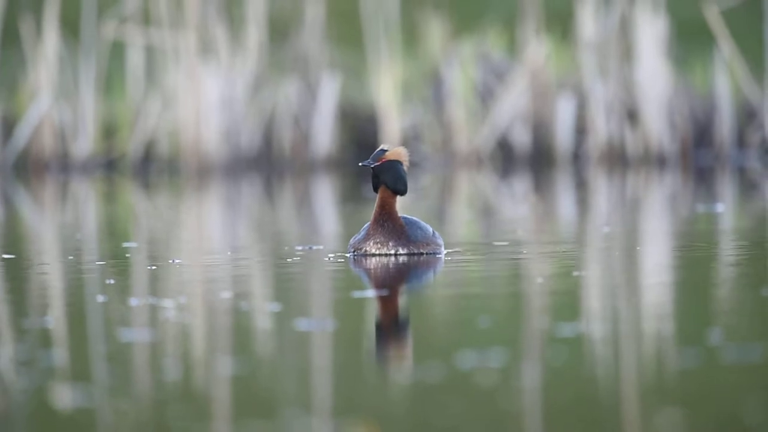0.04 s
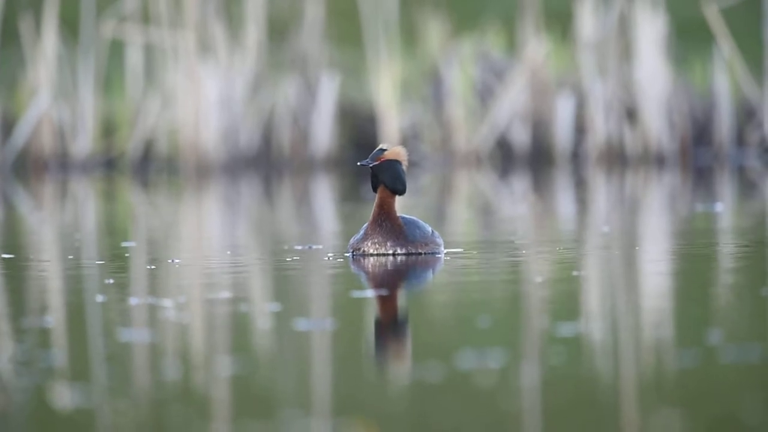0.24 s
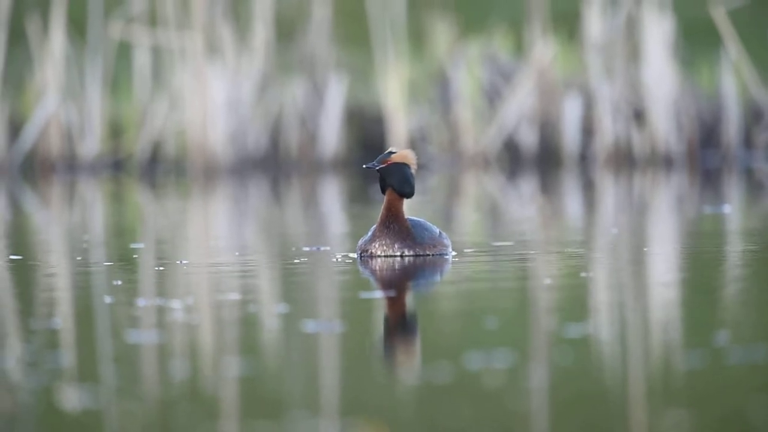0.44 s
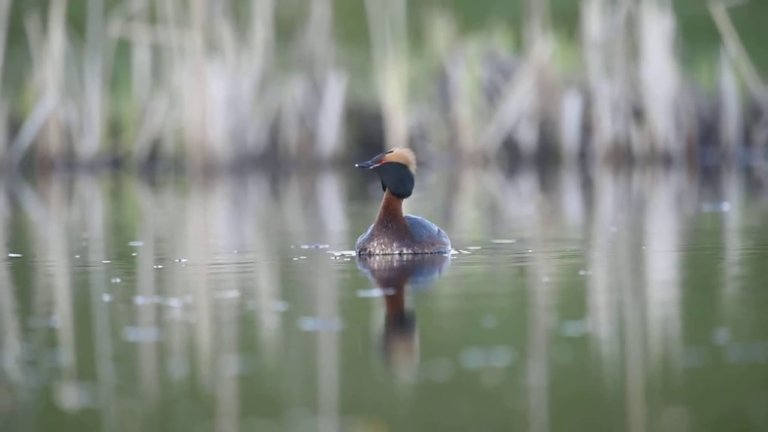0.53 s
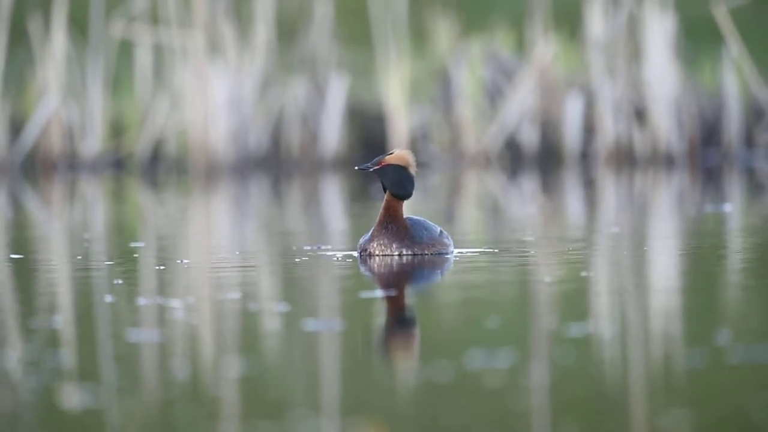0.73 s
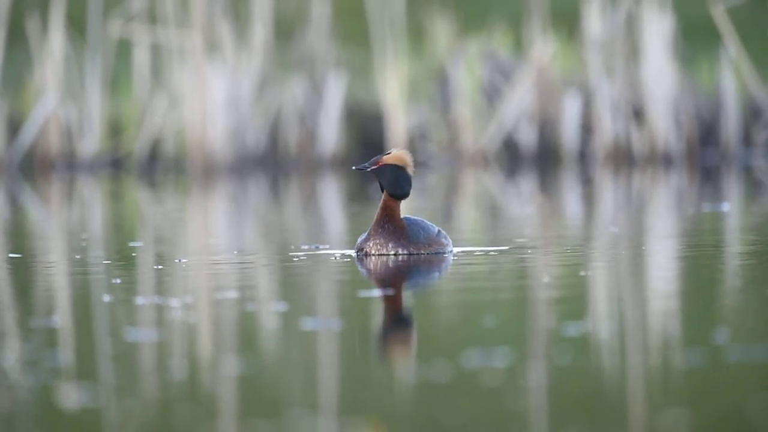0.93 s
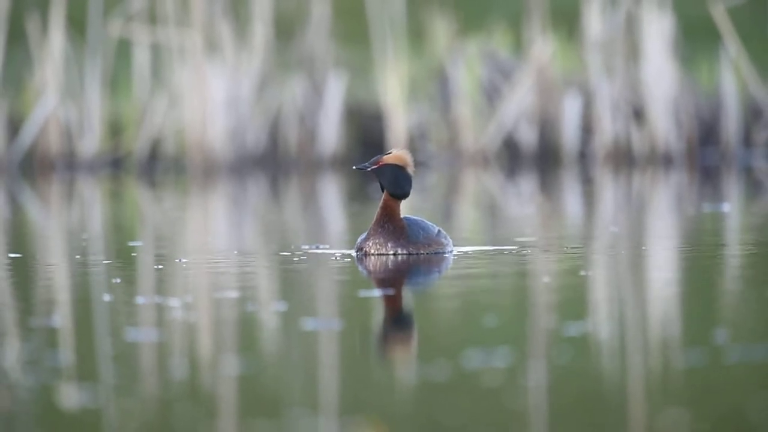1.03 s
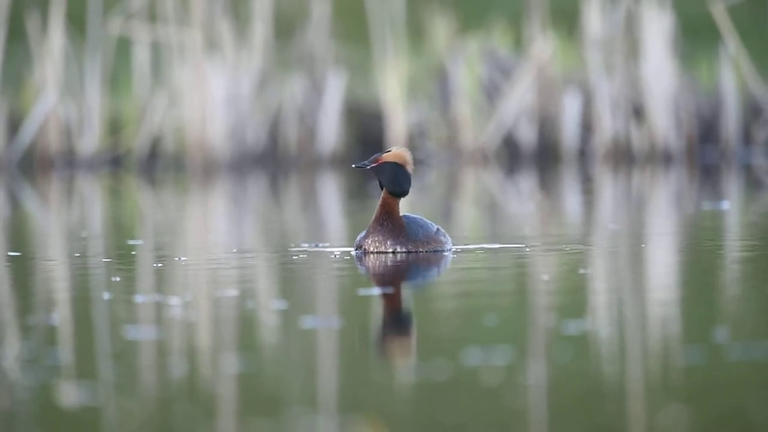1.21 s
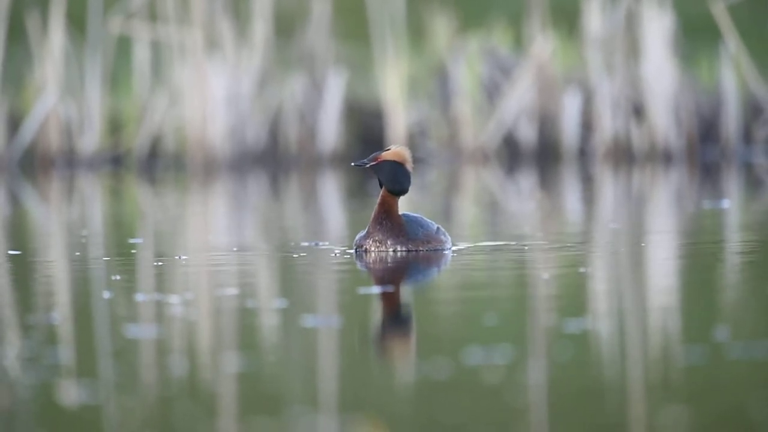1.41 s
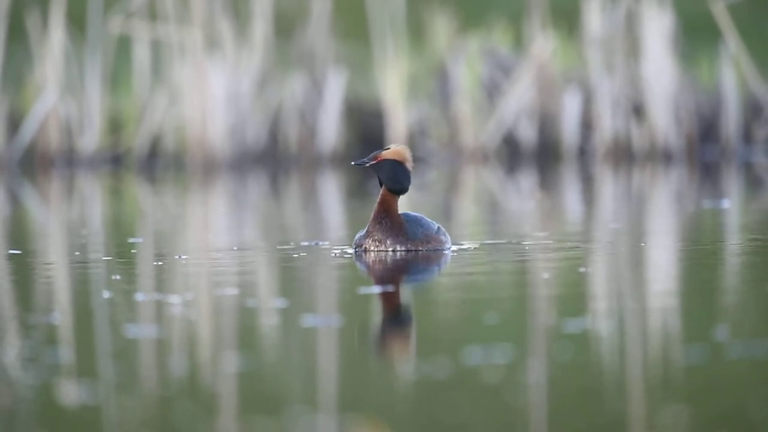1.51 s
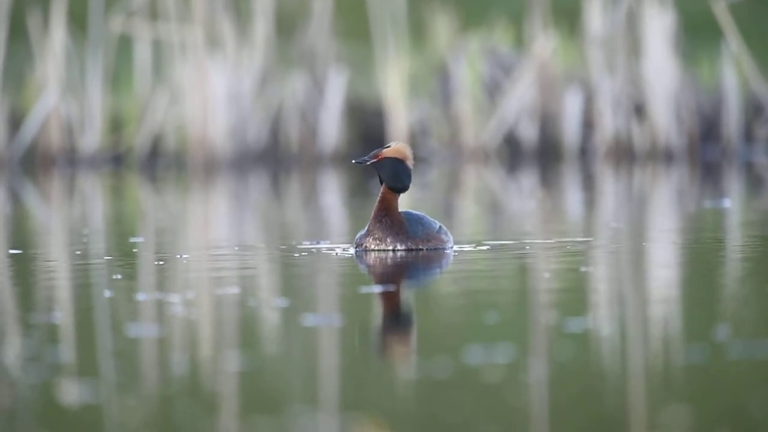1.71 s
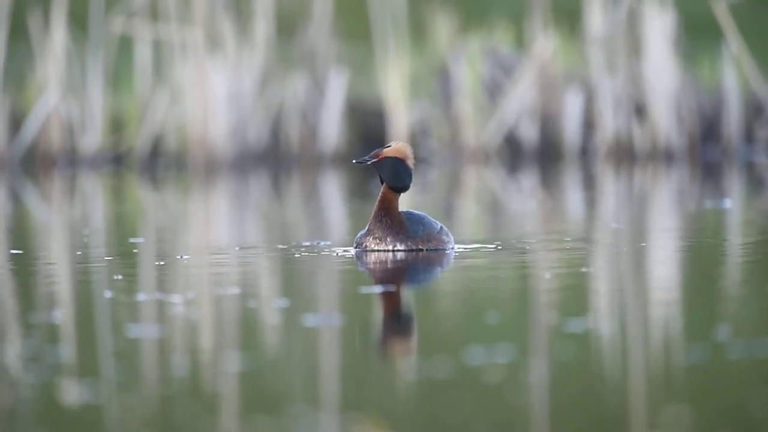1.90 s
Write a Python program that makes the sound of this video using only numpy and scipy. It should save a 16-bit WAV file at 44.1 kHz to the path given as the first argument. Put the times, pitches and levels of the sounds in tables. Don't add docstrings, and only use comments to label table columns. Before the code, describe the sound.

A grebe gives a soft short hoot, then a thin wavering wail that sags and breaks into a rough trill; outdoors on still water, low wind thumps buffet the microphone over steady faint hiss.

```python
import sys
import numpy as np
from scipy import signal
from scipy.fft import rfft, irfft
from scipy.io import wavfile
from scipy.ndimage import uniform_filter1d

SR = 44100
rng = np.random.default_rng(int(sys.argv[2]) if len(sys.argv) > 2 else 0)


def amplitude_ratio(level_db):
    exponent = np.asarray(level_db, float) / 20
    return 10 ** exponent


def to_wav(s):
    ch = np.atleast_2d(s).T
    pcm = np.round(np.clip(ch, -1, 1) * 32767)
    wavfile.write(sys.argv[1], SR, pcm.astype(np.int16))


N = 85995


def evened(x):
    return x / np.sqrt(np.mean(x ** 2) + 1e-20)


def read(points, hz):
    f, db = np.transpose(points)
    return np.interp(np.log(hz + 1), np.log(f + 1), db)


def drift(size, span_s):
    n = max(round(span_s * SR), 2)
    once = uniform_filter1d(rng.standard_normal(size), n)
    return evened(uniform_filter1d(once, n))


def coloured(points, edge_db):
    hz = np.fft.rfftfreq(N, 1 / SR)
    octaves_below = np.maximum(np.log2(points[0][0] / (hz + 1)), 0)
    octaves_above = np.maximum(np.log2((hz + 1) / points[-1][0]), 0)
    colour_db = read(points, hz) + edge_db * (octaves_below + octaves_above)
    return evened(irfft(rfft(rng.standard_normal(N)) * amplitude_ratio(colour_db), N))


def blip(s, db, hz, length, glide=0., phase=0.):
    out = np.zeros(N)
    reach = 3 * length
    part = slice(max(round((s - reach) * SR), 0), round((s + reach) * SR))
    t = (np.arange(N) / SR - s)[part]
    bell = .5 ** ((2 * t / length) ** 2)
    out[part] = amplitude_ratio(db) * bell * np.cos(2 * np.pi * (hz * t + glide * t ** 2 / 2 + phase))
    return out


def hiss():
    # pitch_hz, level_db (per Hz)
    hiss_colour = [(88, -51), (197, -0.5), (381, -4.5), (1570, -10), (3480, -15.5), (8000, -25),
                   (12500, -31), (15500, -38)]
    level_db = -58 + 0.14 * drift(N, 0.02)
    return amplitude_ratio(level_db) * coloured(hiss_colour, edge_db=-16)


def wind_rumble():
    # pitch_hz, level_db (per Hz)
    rumble_colour = [(11, -31), (18, 3), (48, 2.5), (118, -5), (271, -21.5), (400, -67), (520, -99),
                     (880, -120)]
    # time_s, level_db
    strength = [(0.0, -54.5), (0.152, -52.5), (0.368, -52), (0.618, -49), (0.7, -52), (0.82, -48.5),
                (0.988, -52.5), (1.232, -52), (1.406, -53.5), (1.606, -51.5), (1.95, -54.5)]
    lumps_db = 3 * drift(N, 0.022)
    level_db = np.interp(np.arange(N) / SR, *np.transpose(strength)) + lumps_db
    return coloured(rumble_colour, edge_db=-18) * amplitude_ratio(level_db)


def wind_thumps():
    # peak_s, peak_db, pitch_hz
    buffet = [
        (.917, -27.5, 83),
        (.929, -19.5, 121),
        (.945, -31, 67),
    ]
    # peak_s, peak_db, pitch_hz
    puffs = [(0.204, -53, 70.0), (0.245, -34.5, 82), (0.273, -33, 88.0), (0.297, -36.5, 43),
             (0.399, -38.5, 49.4), (0.424, -38, 69.6), (0.456, -36, 64.6), (0.494, -27.5, 80.0),
             (0.55, -54, 97), (0.617, -32, 81), (0.659, -43, 69.0), (0.711, -37.5, 75.4),
             (0.783, -35.5, 73.5), (0.893, -39, 57), (1.017, -41, 98), (1.178, -38.5, 56.0),
             (1.241, -39.5, 84), (1.287, -43, 82.5), (1.335, -42, 74), (1.387, -39.0, 77), (1.463, -31, 71),
             (1.502, -39.5, 85.4), (1.543, -32.0, 78), (1.573, -34.0, 64.4), (1.629, -47, 60.0),
             (1.691, -48, 71), (1.79, -45, 62.3), (1.818, -50, 60.0), (1.904, -41, 103),
             (1.927, -44.0, 74.0)]
    # pitch_multiple, level_db, length_cycles
    thump = [
        (.55, -7.5, 1.67),
        (1., 2.5, 0.84),
        (1.9, -10, 1.38),
        (3.2, -24.5, 3.8),
    ]
    out = np.zeros(N)
    for s, db, hz in [*buffet, *puffs]:
        for multiple, part_db, cycles in thump:
            part_hz = multiple * hz
            out += blip(s, db + part_db, part_hz, cycles / part_hz, phase=rng.random())
    return out


def songbird():
    # peak_s, peak_db, pitch_hz, length_s, glide_hz_per_s
    warble = [(1.605, -68, 3250, .02, 500), (1.625, -67, 3340, .015, 1500), (1.688, -63, 3560, .014, 1000),
              (1.708, -66, 2980, .012, 3000), (1.722, -66, 3130, .016, 5000),
              (1.735, -63.5, 3440, .013, 2000), (1.77, -69, 3150, .025, -500),
              (1.8, -66, 2870, .016, -4000), (1.858, -68, 2900, .02, 1500)]
    return sum(blip(*note) for note in warble)


def plips_and_ticks():
    # peak_s, peak_db, pitch_hz, length_s
    small_sounds = [
        (1.4966, -48, 1600, .0012),
        (1.4987, -40.5, 1750, .0009),
        (1.5015, -50, 2200, .001),
        (1.5035, -49, 1500, .0012),
        (.086, -64, 12500, .0003),
        (.1055, -60, 12500, .0003),
        (.226, -66, 12000, .0004),
        (.618, -62, 11200, .001),
    ]
    return sum(blip(*row) for row in small_sounds)


def reeds(x):
    t = np.arange(SR // 3) / SR
    sparse = rng.standard_normal(len(t)) * (rng.random(len(t)) < .04)
    taps = sparse * amplitude_ratio(-60 * t / .2) * (t > .004)
    return amplitude_ratio(-13) * signal.fftconvolve(x, taps / np.linalg.norm(taps))[:N]


def voice(start, end, hz, effort_db, dull_db, jitter):
    # pitch_hz, level_db
    throat = [(400, -4), (900, -.3), (1600, -8), (1800, -5.5), (2000, -6), (2500, -1.5), (3000, -4),
              (3400, -25)]
    t = np.arange(N) / SR
    hz = uniform_filter1d(hz, size=200) * (1 + jitter * drift(N, .002))
    gate = uniform_filter1d(1. * (t > start) * (t < end), size=130)
    upper_db = dull_db + 1.5 * np.minimum(effort_db - np.max(effort_db) + 5, 0)
    turns = 2 * np.pi * np.cumsum(hz) / SR
    partials = np.zeros(N)
    for k in range(1, 5):
        shimmer_db = 1.6 * drift(N, .006)
        partial_db = read(throat, k * hz) + (k > 1) * upper_db + shimmer_db
        partials += amplitude_ratio(partial_db) * np.sin(k * turns)
    return np.sqrt(2) * amplitude_ratio(effort_db) * gate * partials


def hoot():
    # time_s, pitch_hz, level_db
    contour = [
        (.445, 640, -65),
        (.462, 750, -57),
        (.474, 845, -54),
        (.49, 810, -52.5),
        (.5, 740, -58),
        (.52, 640, -67),
    ]
    s, hz, db = np.transpose(contour)
    t = np.arange(N) / SR
    return voice(s[0], s[-1], np.interp(t, s, hz), np.interp(t, s, db), dull_db=-4, jitter=.01)


def wail():
    # time_s, pitch_hz
    waver = [(.612, 400), (.64, 895), (.68, 950), (.725, 850), (.8, 992), (.85, 980), (.875, 950),
             (.945, 995), (1.0, 962)]
    # time_s, pitch_hz
    sag = [(1.055, 986), (1.1, 922), (1.12, 930), (1.17, 888), (1.236, 870)]
    # time_s, level_db
    effort = [(.612, -68), (.642, -56), (.675, -59.5), (.718, -56), (.75, -61.5), (.8, -57), (.88, -59.5),
              (1.0, -58), (1.236, -61)]
    # centre_s, swerve_hz, length_s
    catches = [(.659, -30, .012), (.715, -62, .011), (.693, -12, .008), (.768, -135, .016),
               (.861, -30, .008), (.893, -25, .008), (.991, -45, .009), (1.106, -20, .008)]
    t = np.arange(N) / SR
    hz = np.interp(t, *np.transpose([*waver, *sag]))
    for s, swerve_hz, length in catches:
        hz = hz + swerve_hz * blip(s, 0, 0, length)
    effort_db = np.interp(t, *np.transpose(effort))
    return voice(waver[0][0], sag[-1][0], hz, effort_db, dull_db=-.3, jitter=.01)


def trill():
    # start_s, length_s, level_db, top_hz, fall_hz
    notes_sung = [
        (1.237, .013, -58, 875, 75),
        (1.253, .012, -61, 830, 45),
        (1.27, .019, -58, 870, 100),
        (1.29, .016, -59, 860, -55),
        (1.305, .018, -60, 880, 150),
        (1.326, .013, -62, 850, 60),
        (1.341, .007, -59, 820, 60),
    ]
    t = np.arange(N) / SR
    out = np.zeros(N)
    for s, length, db, top_hz, fall_hz in notes_sung:
        hz = top_hz - fall_hz * np.clip((t - s) / length, 0, 1)
        out += voice(s, s + length, hz, db, dull_db=-2, jitter=.06)
    return out


def grebe():
    return hoot() + wail() + trill()


def scene():
    background = hiss() + wind_rumble() + wind_thumps()
    near_and_far = songbird() + plips_and_ticks() + grebe()
    return (background + near_and_far + reeds(near_and_far))[None]


def low_pass(x):
    return signal.sosfilt(signal.butter(12, 15630, fs=SR, output="sos"), x)


def record(dry):
    mic_low_hz, edge_hz = 30.2, 15900
    thinned = signal.lfilter(*signal.butter(2, mic_low_hz, "high", fs=SR), dry)
    band_limit = signal.firwin(511, edge_hz, window=("kaiser", 9), fs=SR)
    limited = signal.oaconvolve(thinned, band_limit[None], "same")
    return low_pass(limited)


dry = scene()
out = record(dry)
to_wav(out)
```